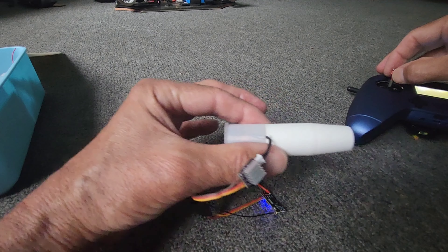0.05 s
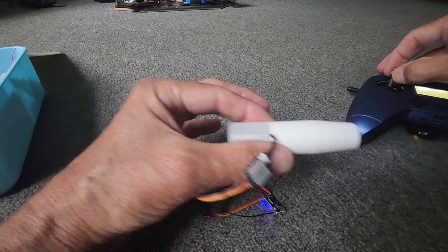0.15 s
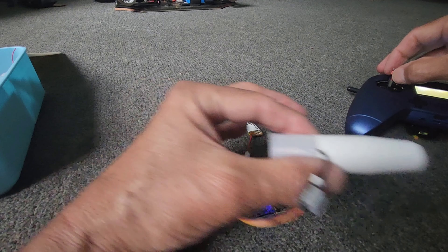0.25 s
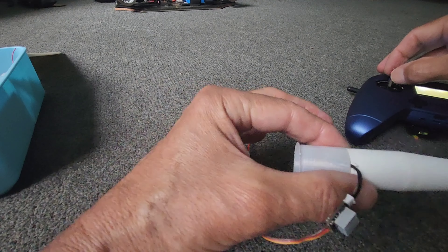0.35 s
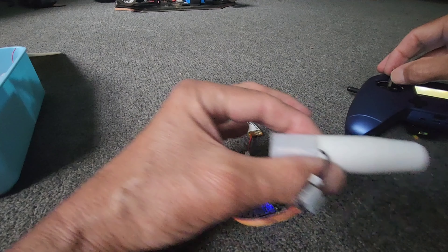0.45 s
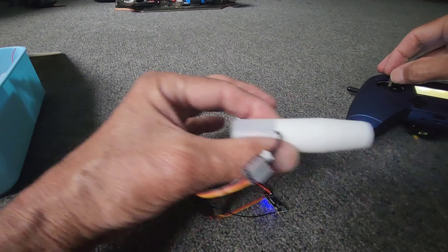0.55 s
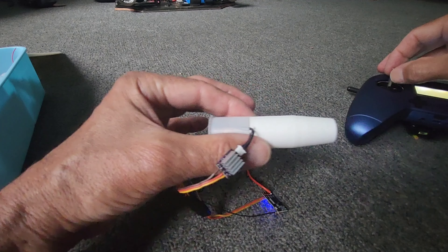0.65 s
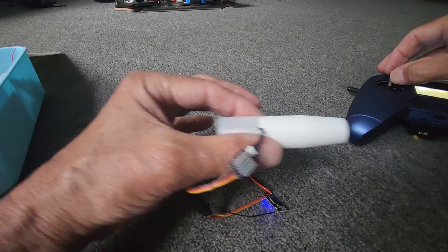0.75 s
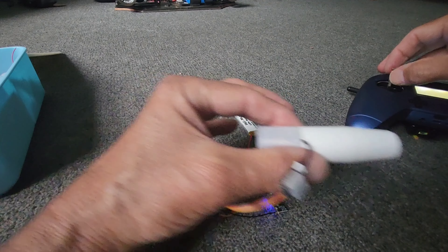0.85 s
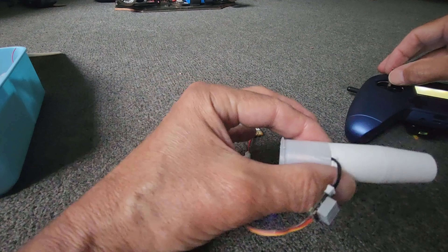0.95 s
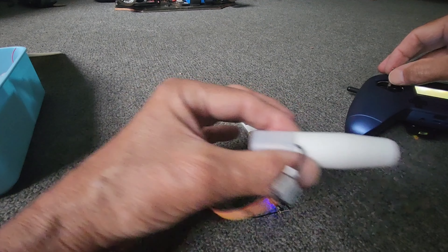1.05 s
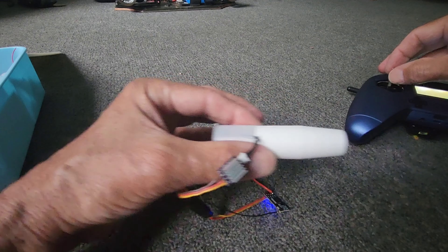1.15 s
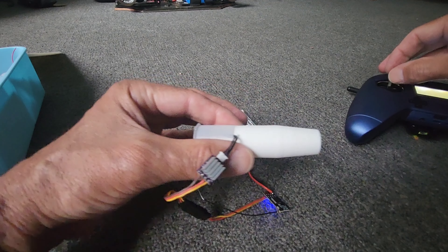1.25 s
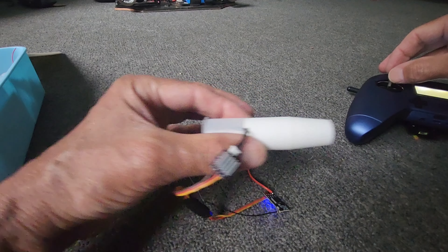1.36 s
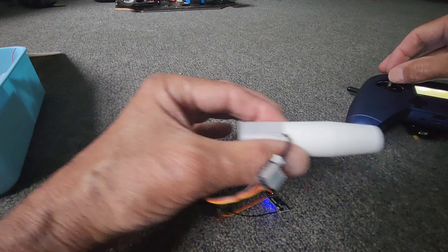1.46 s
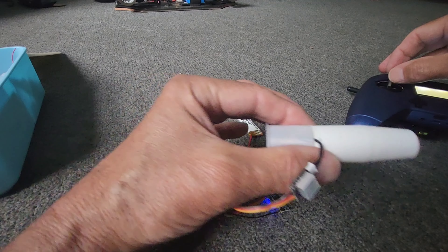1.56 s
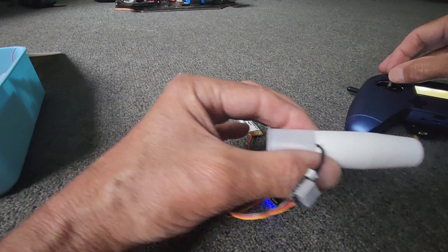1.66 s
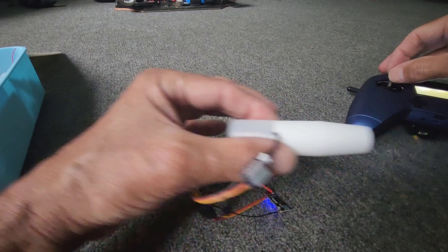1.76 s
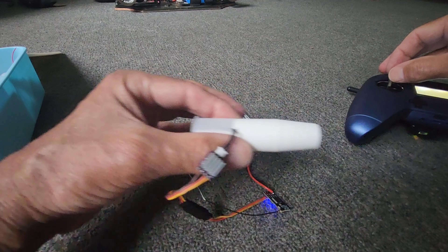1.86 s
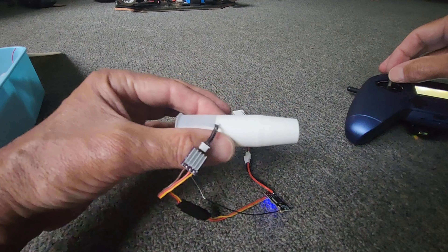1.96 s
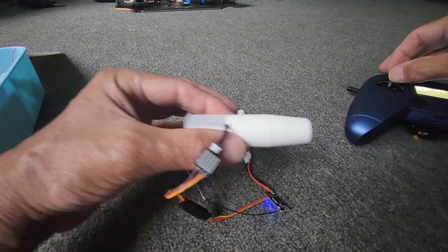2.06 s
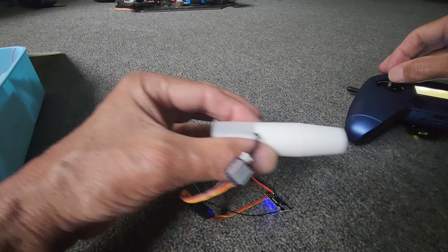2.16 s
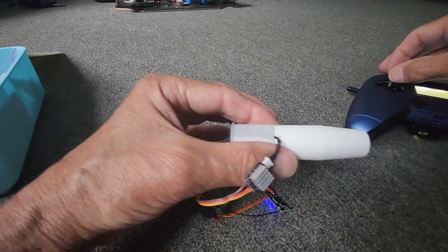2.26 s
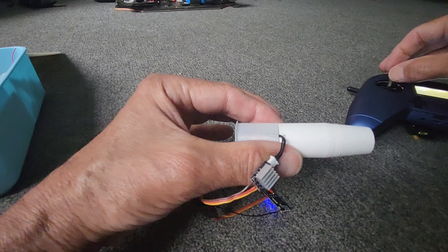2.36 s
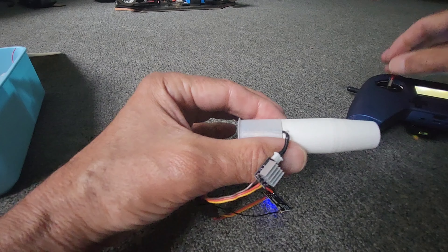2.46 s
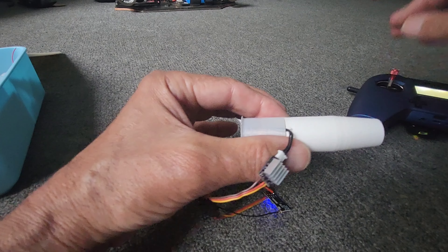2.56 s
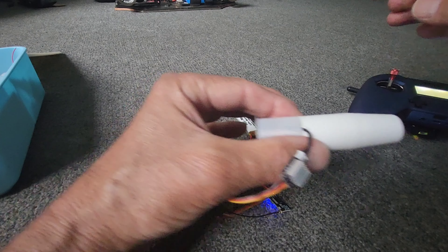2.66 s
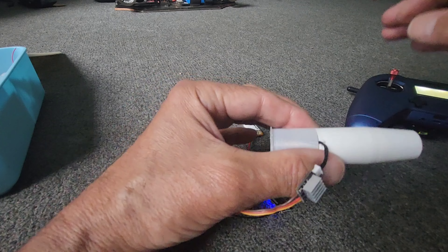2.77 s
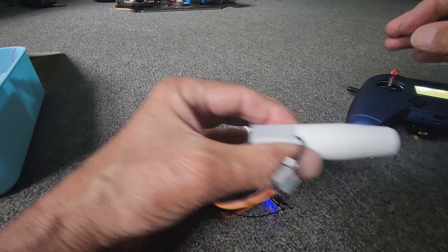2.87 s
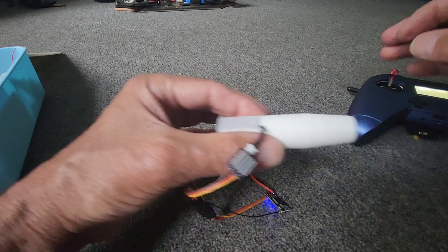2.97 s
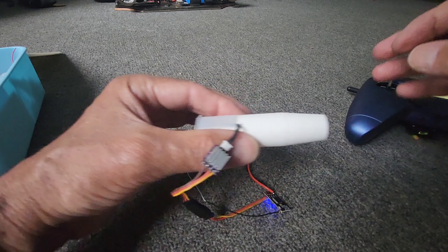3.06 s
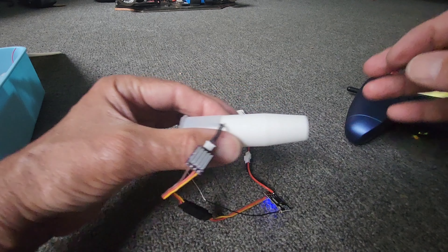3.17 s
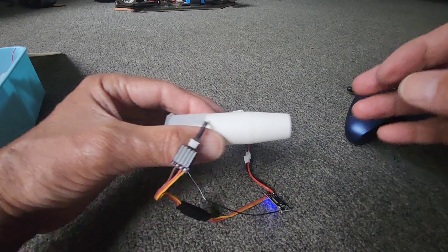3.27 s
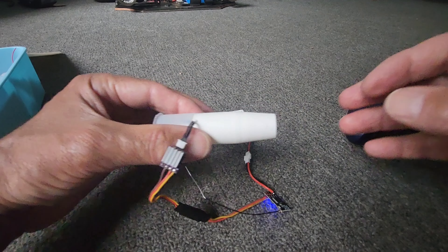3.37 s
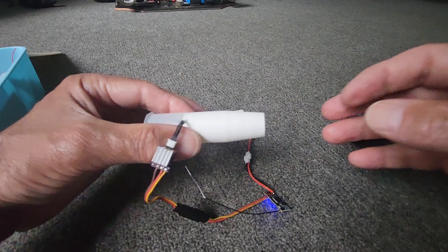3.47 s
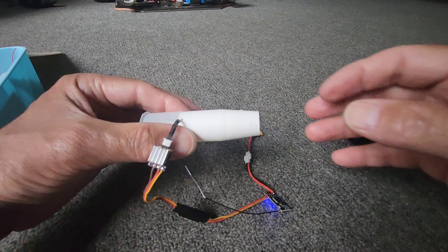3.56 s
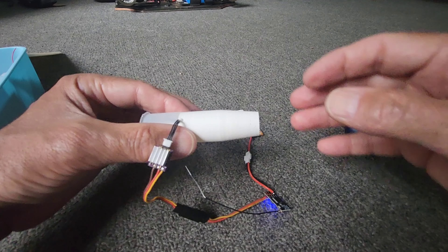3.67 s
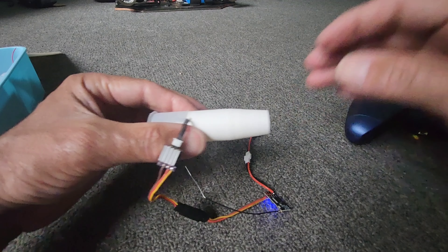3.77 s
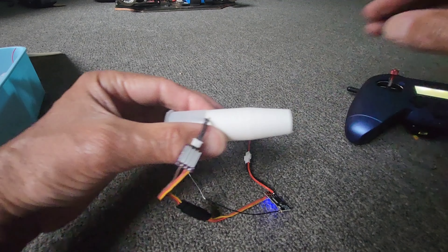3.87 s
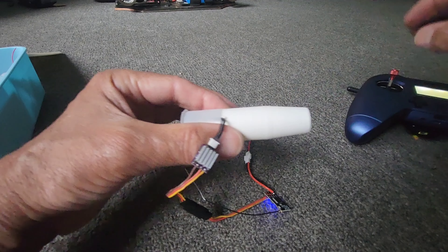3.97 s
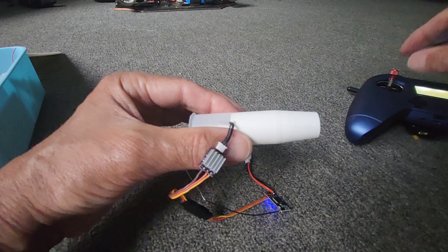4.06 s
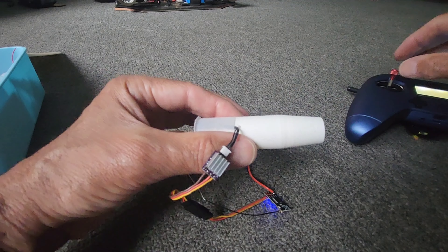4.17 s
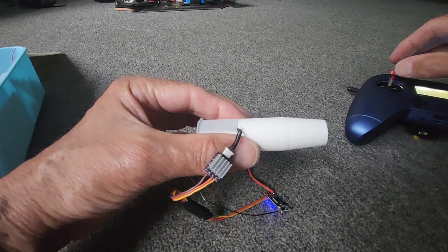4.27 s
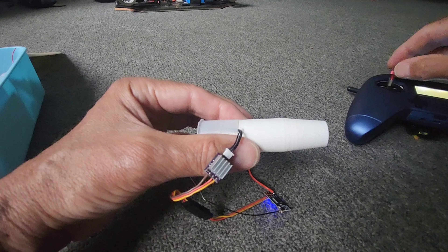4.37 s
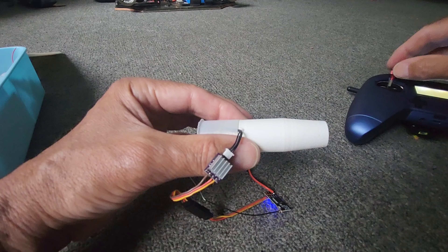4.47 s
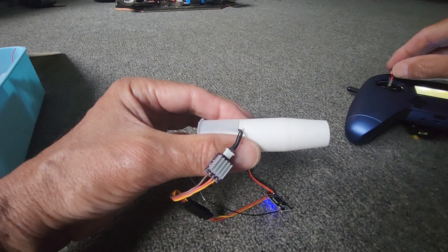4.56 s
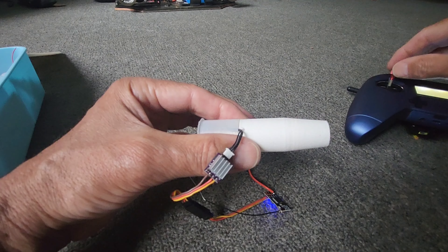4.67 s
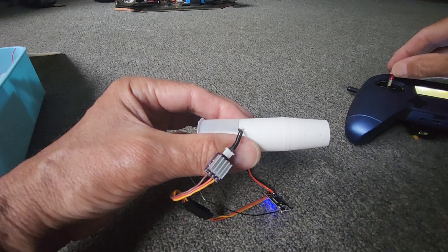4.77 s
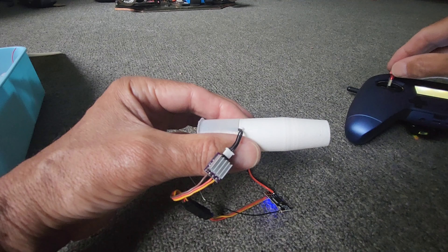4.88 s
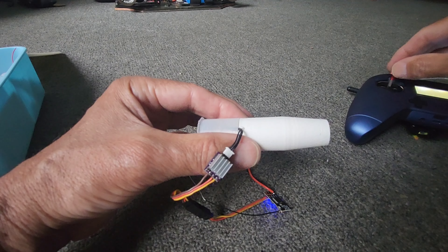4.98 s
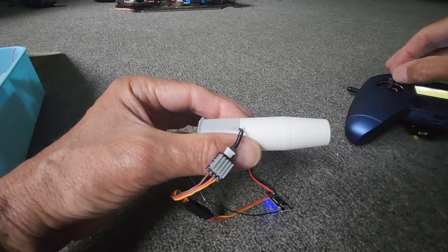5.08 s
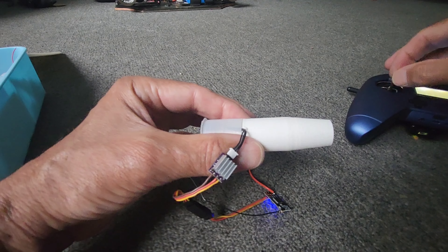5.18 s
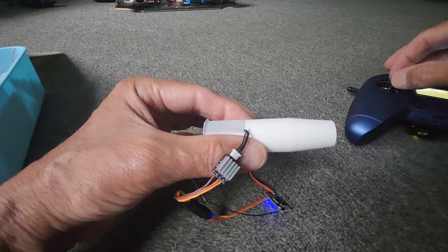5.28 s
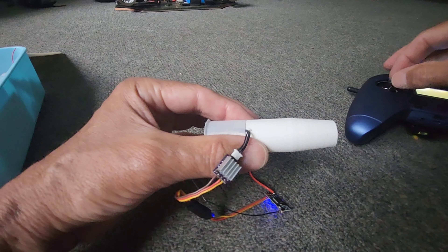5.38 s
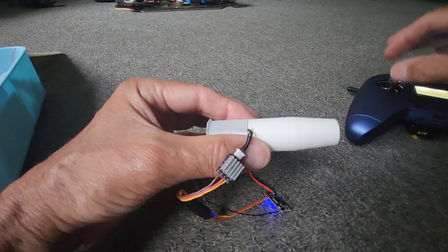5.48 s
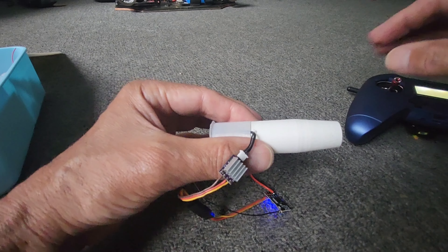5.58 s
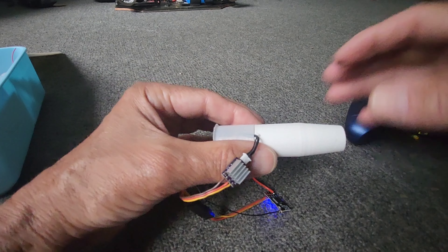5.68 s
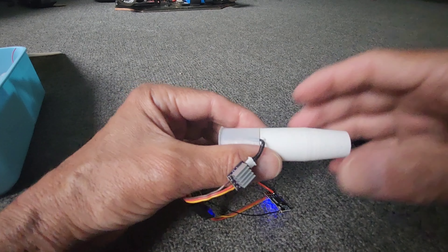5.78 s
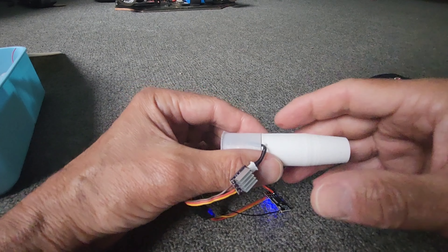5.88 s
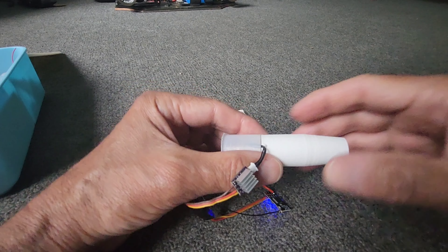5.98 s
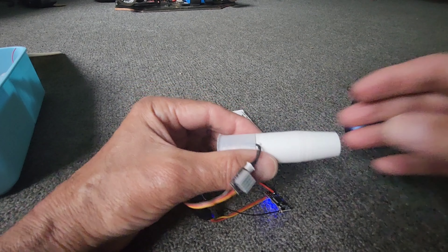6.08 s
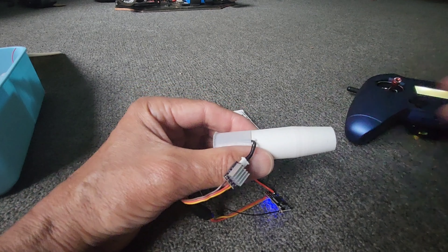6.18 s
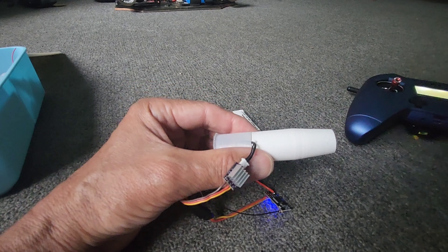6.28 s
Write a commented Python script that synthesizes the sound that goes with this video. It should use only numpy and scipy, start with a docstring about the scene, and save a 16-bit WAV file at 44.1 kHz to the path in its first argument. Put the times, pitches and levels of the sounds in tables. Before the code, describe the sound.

Close, steady high whine and hissing jet of a tiny electric fan, wavering as it is swung, then a split-second diving stop and faint hum.

```python
"""A small electric ducted fan, held in the hand in a carpeted room, runs at full speed and then brakes to a stop.
Sines at multiples of its turning rate make the whine, and noise shaped by duct resonances makes the rush of air.
As it stops, the motor's pole whistle dives through the treble and rings the housing. The duct swings from side
to side, which recolours the rush; midway the free hand crosses the jet, shading the whine and blowing air over
the microphone. Some appliance hums behind it in steady sines, with room hiss and low rumble from noise."""
import sys
import numpy as np
from scipy import signal
from scipy.fft import rfft, irfft
from scipy.io import wavfile
from scipy.ndimage import map_coordinates

SR = 44100
rng = np.random.default_rng(int(sys.argv[2]) if len(sys.argv) > 2 else 0)


def wav_out(sig):
    """Save sig, one row per channel (or a flat mono array), as 16-bit PCM at SR to the path in sys.argv[1]."""
    wavfile.write(sys.argv[1], SR, np.round(np.clip(np.atleast_2d(sig).T, -1, 1) * 32767).astype(np.int16))


N = 279153
TIME = np.arange(N) / SR
FREQS = np.maximum(np.fft.rfftfreq(N, 1 / SR), 1)


def from_db(db):
    """Decibels to gain."""
    return 10 ** (np.asarray(db) / 20)


def rms_one(x):
    """Scale to unit power."""
    return x / np.sqrt(np.mean(x ** 2) + 1e-20)


def in_time(rows):
    """Each column of a curve, sample by sample."""
    s, *columns = np.transpose(rows)
    return [np.interp(TIME, s, column) for column in columns]


def colour(points):
    """Gain at every frequency, one row for each dB column."""
    hz, *columns = np.transpose(points)
    return from_db([np.interp(np.log(FREQS), np.log(hz), column) for column in columns])


def drift(rate_hz):
    """Smooth random wander with spread 1: noise through a two-pole low-pass at rate_hz."""
    step = 40   # samples between wander points
    r = np.exp(-2 * np.pi * rate_hz * step / SR)
    white = rng.standard_normal(N // step + 2002)
    slow = signal.lfilter([1], [1, -2 * r, r * r], white)[2000:]   # skip the filter's start
    return np.interp(np.arange(N) / step, np.arange(len(slow)), rms_one(slow))


def bump(peak_s, half_s):
    """A bell-shaped swell that falls to 1/e half_s away from its peak."""
    return np.exp(-((TIME - peak_s) / half_s) ** 2)


def pan(side_db):
    """Left and right gains whose mean is 1; positive leans left."""
    ratio = np.atleast_1d(from_db(side_db))
    return 2 * np.array([ratio, np.ones_like(ratio)]) / (1 + ratio)


def noise(gains, alike, lag_ms=0):
    """Coloured stereo noise of rms 1; the part common to both sides reaches the right one later."""
    left, own = rng.standard_normal((2, len(FREQS))) + 1j * rng.standard_normal((2, len(FREQS)))
    late = left * np.exp(-2j * np.pi * FREQS * lag_ms / 1000)
    right = alike * late + np.sqrt(1 - alike ** 2) * own
    return rms_one(irfft(np.array([left, right]) * gains, N))


def tone(phase, lead=0):
    """A stereo sine of rms 1; the left side leads by some radians."""
    return np.sqrt(2) * np.sin([phase, phase - lead])


def ring(x, hz, t60):
    """One resonance with gain 1 at its top, dying by 60 dB in t60 seconds."""
    r, w = from_db(-60 / (t60 * SR)), 2 * np.pi * hz / SR
    feed = np.array([1, 0, -1]) * (1 - r * r) / 2
    return signal.lfilter(feed, [1, -2 * r * np.cos(w), r * r], x + 1e-18)


def shifted(x, ratio):
    """Move every frequency of a noise by a changing ratio, reading it faster or slower."""
    place = np.cumsum(ratio) % (N - 1)
    return np.array([map_coordinates(side, [place], order=3, mode="nearest") for side in x])


def room(x, t60, wet_db):
    """Diffuse tail of the room, different on each side; the carpet swallows the treble sooner."""
    t = TIME[:SR // 2]
    white = rng.standard_normal((2, len(t))) * (t > .004)   # the tail starts after 4 ms
    dull = signal.sosfiltfilt(signal.butter(2, 8000, fs=SR, output="sos"), white)
    decay = from_db(-60 * t / t60)
    tail = dull * decay + (white - dull) * decay ** 1.4
    tail /= np.sqrt(np.sum((white * decay) ** 2, axis=1, keepdims=True))
    return x + from_db(wet_db) * signal.fftconvolve(x, tail, axes=1)[:, :N]


# Relative spectrum of the room hiss: pitch_hz [Hz], density_db [dB per Hz]
ROOM_HISS_COLOUR = [(59, -39), (100, -21), (166, -7), (223, -7), (270, -6.5), (429, -16.5), (1210, -15),
                    (1430, -21), (1550, -14), (1730, -20), (2130, -20), (7560, -23.5), (9540, -40),
                    (11300, -36), (15500, -38)]


def room_hiss():
    """The room's steady hiss, leaning left, its sides less alike towards the treble."""
    gains = colour(ROOM_HISS_COLOUR) * FREQS / np.hypot(FREQS, 250)
    return from_db(-51) * pan(side_db=6.0) * noise(gains, alike=.5 / (1 + FREQS / 2500))


# Curve of the appliance's main hum, before a common trim: start_s [s], level_db [dB]
HUM_CURVE = [(0, -52), (.5, -46.5), (.75, -47.5), (.96, -53), (1.04, -44.3), (1.45, -44.5), (1.53, -51),
             (1.82, -54), (1.97, -48), (2.9, -48.5), (3.3, -51), (3.67, -45.5), (4.0, -46), (4.39, -50),
             (4.45, -63), (4.55, -44), (4.99, -44.5), (5.09, -51), (5.42, -50.5), (5.62, -45.5),
             (5.95, -44.8), (6.33, -47)]
# The hum's faint steady lines: pitch_hz [Hz], level_db [dB]
FAINT_HUM_LINES = [(118.4, -57.5), (1534, -62.5), (1577, -100), (1895, -74), (2099, -67.5), (3488, -71),
                   (4592, -73)]
HUM_HZ = 219.2   # pitch of the main hum


def appliance_hum():
    """An appliance's main line swells and fades over faint steady lines; each wavers slightly in phase."""
    hum_db, = in_time(HUM_CURVE)
    main_phase = 2 * np.pi * HUM_HZ * TIME + 0.074 * drift(12)
    hum = from_db(hum_db - 1.5) * pan(side_db=3.5) * tone(main_phase, lead=0.24)
    for hz, level_db in FAINT_HUM_LINES:
        line_phase = 2 * np.pi * hz * TIME + 0.36 * drift(9.2)
        hum += from_db(level_db) * pan(side_db=5.0) * tone(line_phase)
    return hum


def deep_rumble(speed):
    """The deepest rumble, around 52 Hz, eases when the fan stops stirring the air."""
    rumble = noise(FREQS ** 2 / (1 + (FREQS / 52) ** 4), alike=0.92)
    return from_db(-60.5 + 6.4 * speed) * rumble


# Relative spectrum of air on the microphone: pitch_hz [Hz], density_db [dB per Hz]
AIR_ON_MIC_COLOUR = [(12, -38), (20, -28), (59, 0), (103, -3), (188, -9), (220, -4.5), (247, -12),
                     (450, -21.5), (580, -71), (990, -120)]
# Gusts the free hand sends over the microphone: peak_s [s], half_s to 1/e [s], level_db [dB]
HAND_GUSTS = [(3.527, 0.48, -45), (6.07, 0.046, -55)]


def draught(speed):
    """Moving air rumbles on the microphone, stronger with the fan running and in the hand's gusts."""
    running_db, still_db = -51, -56
    gains = colour(AIR_ON_MIC_COLOUR)[0] * FREQS / np.hypot(FREQS, 50) / (1 + (FREQS / 600) ** 4)
    flow = from_db(still_db + (running_db - still_db) * speed + 2 * drift(9))
    flow += sum(from_db(level_db) * bump(peak_s, half_s) for peak_s, half_s, level_db in HAND_GUSTS)
    return flow * pan(side_db=-0.8) * noise(gains, alike=0.9)


# Path of the low rumble around the hand's pass: start_s [s], pitch_hz [Hz], level_db [dB]
SINKING_PATH = [(3.0, 135, -75), (3.3, 122, -51), (3.55, 103, -49), (3.9, 85, -50), (4.15, 66, -54),
                (4.4, 59, -51.5), (4.8, 58, -70), (5.2, 58, -90)]


def sinking_rumble():
    """A rough, narrow rumble that slides down and fades: one low sine, jittered in phase and level."""
    hz, level_db = in_time(SINKING_PATH)
    phase = 2 * np.pi * np.cumsum(hz) / SR + 1.3 * drift(9)
    return from_db(level_db + 2.5 * drift(12)) * tone(phase, lead=.1)


HAND_IN_S, HAND_OUT_S, HAND_MOVE_S = 3.28, 4.2, 0.35   # middle of entering, of leaving; time each takes


def hand_in_jet():
    """Share of the jet that the free hand covers: it enters, stays and leaves."""
    inside_s = np.minimum(TIME - HAND_IN_S, HAND_OUT_S - TIME)
    return np.clip(inside_s / HAND_MOVE_S + .5, 0, 1)


# Delay of the echo off the free hand: entering_ms [ms], leaving_ms [ms]
ECHO_DELAYS_MS = (.485, .42)


def hand_echo(x):
    """The free hand throws the rush back to the right side and carves notches that slide upward."""
    delay_s = np.interp(TIME, [HAND_IN_S, HAND_OUT_S], ECHO_DELAYS_MS) / 1000
    echo = map_coordinates(x[1], [(TIME - delay_s) * SR], order=3, mode="nearest")
    share = from_db(-10) * hand_in_jet()
    right = (x[1] + share * echo) / np.hypot(1, share)
    return np.array([x[0], right])


# The hand swings the duct: start_s [s], position [0 = left to 1 = right]
SWING_PATH = [(0, 0.87), (.2, 0.28), (.49, 1), (.8, 0.13), (1.08, 0.94), (1.35, 0.25), (1.53, 0.12),
              (1.78, 0.81), (2.05, 0.013), (2.22, 0.091), (2.45, 0.36), (2.62, 0.42), (2.76, 0.42),
              (2.96, 0.84), (3.25, 0.31), (3.6, 0), (4.1, 0.11), (5.25, 0.16)]


def swing():
    return in_time(SWING_PATH)[0] - .5


def aimed(x, left_db, right_db):
    """The swing turns each side by some dB over full travel; rightward, the right side hears it sooner."""
    position = swing()
    lead_s = 0.0001 * position   # 0.1 ms over the full travel
    right = map_coordinates(x[1], [(TIME + lead_s) * SR], order=5, mode="nearest")
    return np.array([x[0] * from_db(left_db * position), right * from_db(right_db * position)])


def duct(modes, alike, lag_ms, flicker_db):
    """Turbulence rings in a group of broad duct resonances and flickers with the eddies."""
    power = 0
    for hz, width_hz, level_db in modes:
        off_centre = (FREQS - hz * hz / FREQS) / width_hz
        power = power + from_db(level_db) ** 2 / width_hz / (1 + off_centre ** 4)
    return noise(np.sqrt(power), alike, lag_ms) * from_db(flicker_db * drift(28))


# Relative spectrum of the nozzle hiss: pitch_hz [Hz], left_db [dB per Hz], right_db [dB per Hz]
NOZZLE_HISS_COLOUR = [(252, -20.5, -25), (540, -8.5, -12.5), (760, -5, -9.5), (1800, 0.5, -5),
                      (3030, 6.5, 1.5), (3300, 2.5, 5), (3900, 4, 1), (5240, 3.5, 1.5), (5600, -9, 8),
                      (5760, -2, -3), (6800, 0, 7.5), (7600, 10, 3), (8620, 6, 2), (9030, -2.5, -4.5),
                      (11300, 0, -4.5), (11970, 0, -1), (14800, 4.5, 2), (15500, 3.5, -8.5)]
# Throat resonances, relative within the group: pitch_hz [Hz], width_hz [Hz], level_db [dB]
THROAT_RESONANCES = [(2085, 240, -6.5), (2450, 660, -0.5)]
# The resonance at the top of the rush: pitch_hz [Hz], width_hz [Hz], relative level_db [dB]
TOP_RESONANCE = [(11870, 160, 0)]


def jet(speed):
    """Nozzle hiss, throat and top resonances follow the duct's aim; the hiss dulls as the rotor slows."""
    gains = colour(NOZZLE_HISS_COLOUR) * FREQS / np.hypot(FREQS, 200)
    hiss = from_db(-26) * noise(gains, alike=0.25 / (1 + (FREQS / 4500) ** 2), lag_ms=0.12)
    # above 8600 Hz the hiss comes straight from the nozzle and dies sooner than the hiss below
    treble = irfft(rfft(hiss) / (1 + (8600 / FREQS) ** 16), N)
    body = aimed(hiss - treble, left_db=-1.0, right_db=1.5)
    throat = duct(THROAT_RESONANCES, alike=0.69, lag_ms=0.021, flicker_db=1.5)
    throat = pan(side_db=8.0) * from_db(-1.5 * hand_in_jet()) * throat
    body += from_db(-35.5) * aimed(throat, left_db=-3.5, right_db=8)
    treble = aimed(treble, left_db=-2.5, right_db=3)
    top = pan(side_db=-3.0) * duct(TOP_RESONANCE, alike=.4, lag_ms=0.044, flicker_db=1.5)
    treble += from_db(-46) * aimed(top, left_db=8, right_db=16)
    return body * speed ** 1.17 + treble * speed ** 2.6


# Duct resonances, relative within each group: pitch_hz [Hz], width_hz [Hz], level_db [dB]
LOW_RESONANCE = [(4232, 480, 0)]
MAIN_RESONANCE = [(4745, 335, 0)]
MIDDLE_RESONANCES = [(5330, 320, -7), (6180, 760, 0)]
HIGH_RESONANCES = [(7185, 700, 3.5), (8360, 830, -11)]
# Resonance levels before a small trim each:
# start_s [s], low_db [dB], main_db [dB], main_side_db [left-right dB], high_db [dB]
RESONANCE_LEVELS = [(0.0, -32, -30.5, 21, -27.5), (0.23, -31.5, -28, 23, -29), (0.7, -32.5, -28.5, 6, -28),
                    (1.04, -32.5, -27, 17, -28.5), (1.3, -34, -27.5, 5, -30), (1.8, -30.5, -26, 10, -28.5),
                    (2.09, -32.5, -27, 5.5, -28.5), (2.89, -33.5, -29.5, 14, -30),
                    (3.37, -32.5, -30, 7, -29.5), (3.74, -33, -31.5, 24, -27),
                    (4.18, -32.5, -32, 10, -30.5), (4.6, -27.5, -27.5, 14, -29.5),
                    (5.0, -30, -30.5, 10, -30.5), (5.21, -29, -29, 13, -29.5)]
# Level of the middle resonances, which beam forward: start_s [s], level_db [dB]
MIDDLE_CURVE = [(0, -31), (.15, -28.5), (.47, -26), (.8, -29), (1.06, -29), (1.43, -36.5), (1.68, -27.5),
                (1.88, -24), (2.02, -37), (2.25, -34), (2.53, -28), (2.86, -27.5), (3.1, -28.5),
                (3.37, -39), (3.7, -32.5), (4.05, -34), (4.6, -35), (5.21, -33)]
# Path of the main high resonance with the duct's angle and the grip: start_s [s], pitch_hz [Hz]
HIGH_PITCH = [(0, 7290), (.6, 7340), (1.0, 7210), (1.35, 7220), (1.7, 7310), (2.15, 7150), (2.6, 7140),
              (3.1, 7120), (3.5, 7230), (3.95, 7340), (4.3, 7240), (5.21, 7170)]


def pipe(speed):
    """The duct's strong resonances swell and fade; the high ones shift in pitch, the middle ones beam."""
    low_db, main_db, main_side_db, high_db = in_time(RESONANCE_LEVELS)
    middle_db, = in_time(MIDDLE_CURVE)
    high_hz, = in_time(HIGH_PITCH)
    low = duct(LOW_RESONANCE, alike=0.33, lag_ms=0.4, flicker_db=1.67)
    out = from_db(low_db + 2.5) * pan(side_db=13.5) * low
    main = duct(MAIN_RESONANCE, alike=0.46, lag_ms=0.447, flicker_db=0.5)
    out += from_db(main_db + 0.5) * pan(main_side_db + 0.5) * main
    high = duct(HIGH_RESONANCES, alike=0.7, lag_ms=0.462, flicker_db=1.26)
    high = shifted(high, high_hz / HIGH_RESONANCES[0][0])
    out += from_db(high_db + 1.25) * pan(side_db=19.5) * high
    middle = duct(MIDDLE_RESONANCES, alike=.99, lag_ms=0.257, flicker_db=1.6)
    middle = from_db(middle_db) * pan(7 + 9 * hand_in_jet()) * middle
    return (out + aimed(middle, left_db=0, right_db=-3)) * speed ** 3.8


def rush(speed):
    """All the air noise flutters together with the inflow."""
    return (jet(speed) + pipe(speed)) * from_db(0.5 * drift(65))


# Rotor under power, before flutter: start_s [s], rate_hz [turns per s]
POWERED_RATE = [(0, 984), (.33, 993), (.6, 987.5), (1.1, 983), (1.8, 982.5), (2.1, 976.5), (2.5, 975.5),
                (2.9, 970), (3.3, 970.5), (3.75, 963), (4.2, 964.2), (4.58, 972.8), (4.87, 968.6),
                (5.21, 966.8)]
# Rotor braking, before flutter: start_s [s], rate_hz [turns per s]
BRAKING_RATE = [(5.24, 966), (5.27, 905), (5.30, 775), (5.33, 635), (5.378, 430), (5.41, 328), (5.445, 205),
                (5.484, 94), (5.502, 64), (5.535, 20)]
FULL_SPEED_HZ = BRAKING_RATE[0][1]   # turns per s as the brake bites


def rotor(flutter=0.00194):
    """Turning rate with a slight flutter, as a share of full speed (at most 1), and the shaft angle."""
    rate_hz, = in_time(list(POWERED_RATE) + list(BRAKING_RATE))
    rate_hz = rate_hz * (1 + flutter * drift(35.7))
    angle = 2 * np.pi * np.cumsum(rate_hz) / SR
    return np.minimum(rate_hz / FULL_SPEED_HZ, 1), angle


# Orders stirred up by the braking torque:
# order [multiple of the turning rate], peak_s [s], half_s to 1/e [s], level_db [dB]
BRAKE_ORDERS = [(2, 5.29, .026, -52), (3, 5.295, .02, -42), (3, 5.313, .009, -31.5), (4, 5.288, .018, -43),
                (6, 5.31, .015, -40), (5, 5.272, .02, -27.5), (3, 5.426, .007, -51)]


def brake_buzz(angle):
    """While the brake bites, one order after another swells and sinks roughly with the rotor."""
    buzz = 0
    for order, peak_s, half_s, level_db in BRAKE_ORDERS:
        level = from_db(level_db + 3 * drift(90)) * bump(peak_s, half_s)
        buzz = buzz + level * tone(order * angle + .4 * drift(150), lead=0.48)
    return pan(side_db=10) * buzz


# Housing modes that the falling pole tone sweeps through: pitch_hz [Hz], t60_s [s], gain_db [dB]
HOUSING_MODES = [(2310, .1, 28.7), (3300, .004, 0), (6300, .006, -2), (7500, .009, 16), (8600, .006, 4),
                 (12400, .0015, 9), (15000, .002, 12)]


def pole_whistle(speed, angle):
    """The pole tone, ultrasonic at full speed, falls through the housing's modes and pings the lowest."""
    pole_order = 36   # pole tone cycles per turn
    pitch_hz = pole_order * speed * FULL_SPEED_HZ
    audible = np.clip((SR / 2 - pitch_hz) / 3000, 0, 1)   # silent while above the digital range
    turning = np.clip((pitch_hz - 2050) / 250, 0, 1)   # the drive fades out just below the lowest mode
    level = audible * turning * from_db(-49 + 2 * drift(120))
    whistle = level * tone(pole_order * angle, lead=.8)
    housing = sum(from_db(gain_db) * ring(whistle, hz, t60) for hz, t60, gain_db in HOUSING_MODES)
    return pan(side_db=5) * (from_db(-18) * whistle + housing)


# Orders that swell and fade as the duct points past the microphone:
# start_s [s], sixth_db [dB], ninth_db [dB], twelfth_db [dB]
BEAMED_LEVELS = [(0, -41, -50, -58), (.25, -46, -51, -57), (.48, -34, -51, -44), (.7, -46, -50, -56),
                 (.88, -44, -49, -55), (1.08, -40, -51, -37.5), (1.3, -46, -44, -60), (1.48, -51, -43, -61),
                 (1.67, -33, -53, -52), (1.8, -37, -54, -46), (2.0, -48, -45, -60), (2.3, -44, -46, -57),
                 (2.55, -38.5, -42, -49), (2.83, -33, -52, -48), (3.0, -37, -48, -45), (3.3, -48, -44, -58),
                 (3.67, -36, -45, -60), (4.0, -44, -46, -58), (4.4, -45, -42.5, -58), (4.6, -41, -42, -60),
                 (5.0, -46, -40, -60), (5.21, -48, -41, -60)]


def beamed(speed, angle):
    """The sixth, ninth and twelfth orders swell and fade along drawn curves, wavering in level; turbulence
    blurs their pitch."""
    sixth_db, ninth_db, twelfth_db = in_time(BEAMED_LEVELS)
    sixth = from_db(sixth_db + 1.5 * drift(20)) * pan(side_db=7) * tone(6 * angle + .4 * drift(25), lead=2.0)
    ninth = from_db(ninth_db + 1.5 * drift(20)) * pan(side_db=8) * tone(9 * angle + .3 * drift(25), lead=2.2)
    twelfth = from_db(twelfth_db + drift(20)) * tone(12 * angle + .6 * drift(45), lead=1.6)
    return (sixth + ninth + twelfth) * speed ** 4.3


# Weaker overtones: order [multiple of the turning rate], level_db [dB], side_db [left-right dB],
# swing_db [dB over the full swing]
WEAK_OVERTONES = [(4, -39, 11, 2), (5, -48, 7, 0), (7, -53, 7, 0), (8, -50, 9, 0), (15, -51, 6, -2)]


def overtones(angle):
    """Weaker multiples of the turning rate waver in level and phase and move with the swing."""
    out = 0
    for order, level_db, side_db, swing_db in WEAK_OVERTONES:
        level = from_db(level_db + swing_db * swing() + 2 * drift(5))
        out = out + pan(side_db) * level * tone(order * angle + .7 * drift(45), lead=order * .25)
    return out


# The whine's strong orders, first the open jet, then the change with the hand in it, then the unsteadiness:
# order [multiple of the turning rate], level_db [dB], side_db [left-right dB], hand_db [dB],
# hand_side_db [left-right dB], hand_lead_rad [rad], base flutter_db [dB], jitter_rad [rad], left lead_rad [rad]
STRONG_ORDERS = [(1, -27.5, 7, -1.1, 1, .1, 0.5, 0.02, .65), (2, -45, 15, -3.5, 2, 0, 1.8, 0.65, .6),
                 (3, -33.3, 0, 3.5, 13, 1.4, 1.9, .25, -.25)]
# Slow changes added to the strong orders: start_s [s], first_db [dB], second_db [dB], third_db [dB],
# third_side_db [left-right dB]
STRONG_ORDER_TRENDS = [(0, -.8, 3, 2, 0), (.3, -.8, 3, .5, -3), (.48, -.8, 4.5, 4.5, 0),
                       (.68, -1.2, -2, -2, -4), (1.05, -.3, 7, -.5, 0), (1.42, -.5, -9, 3.5, 5),
                       (1.72, -.3, 8, -3, -6), (2.05, 0.5, -3.5, -.5, 2), (2.33, .6, -3, 0, 5),
                       (2.55, .7, 0, -.5, 0), (2.8, 1.1, 8, 0, 0), (2.95, 1.2, 3, 1.5, 0),
                       (3.2, .8, -2, 0, 0), (3.75, 0, -3, 0.5, 0), (4.17, .7, 2, 1, 3), (4.24, 1, 0, -8, 0),
                       (4.41, .7, 0, -5.5, 1), (4.59, .3, -1, -8.5, -3), (4.8, .3, 0, -1.5, 5),
                       (5.05, .4, -1, -2, 5), (5.21, 0.5, -5, -9, 2)]


def whine(speed, angle):
    """Unbalance gives a clean first order; turbulent inflow wavers the higher ones, and the hand shades them."""
    hand = hand_in_jet()
    *trends_db, third_side_db = in_time(STRONG_ORDER_TRENDS)
    out = overtones(angle)
    for row, trend_db, lean_db in zip(STRONG_ORDERS, trends_db, (0, 0, third_side_db)):
        order, level_db, side_db, hand_db, hand_side_db, hand_lead, flutter_db, jitter, lead = row
        # an order flutters more as it fades, and less with the hand in the jet
        unsteady = 1 - .5 * hand + np.maximum(-trend_db, 0) / 10
        level = from_db(level_db + trend_db + hand_db * hand + flutter_db * unsteady * drift(30))
        sine = tone(order * angle + jitter * drift(22), lead + hand_lead * hand)
        out = out + level * pan(side_db + lean_db + hand_side_db * hand) * sine
    return aimed(out, left_db=0.0, right_db=0.5) * speed ** 4.5


def scene():
    """The fan close by, its reflections, and the room's own sound."""
    speed, angle = rotor()
    background = room_hiss() + appliance_hum() + deep_rumble(speed) + draught(speed) + sinking_rumble()
    air = hand_echo(room(rush(speed), t60=0.24, wet_db=-10.5))
    stopping = room(pole_whistle(speed, angle) + brake_buzz(angle), t60=.3, wet_db=-12)
    return background + air + stopping + beamed(speed, angle) + whine(speed, angle)


def record(dry):
    """The top is cut steeply above 15.6 kHz."""
    return signal.sosfilt(signal.ellip(12, .1, 80, 15600, fs=SR, output="sos"), dry)


dry = scene()
out = record(dry)
wav_out(out)
```